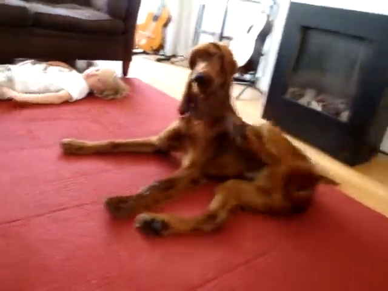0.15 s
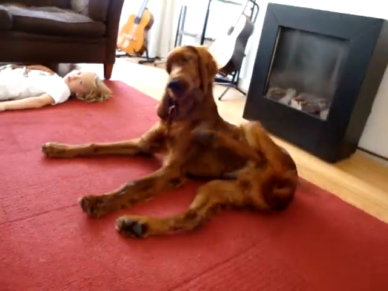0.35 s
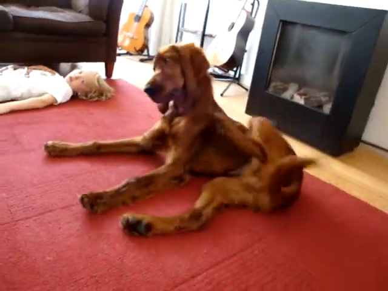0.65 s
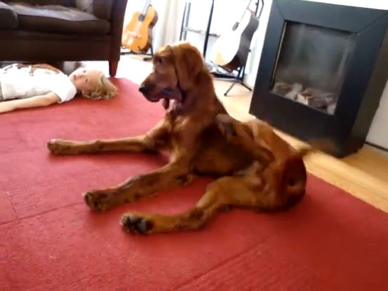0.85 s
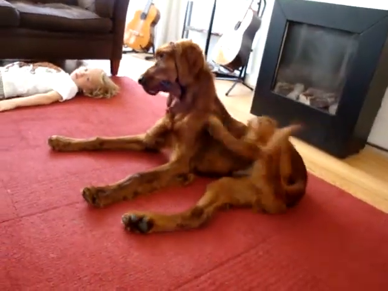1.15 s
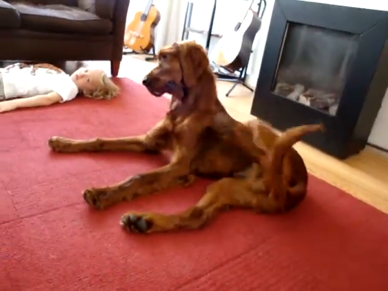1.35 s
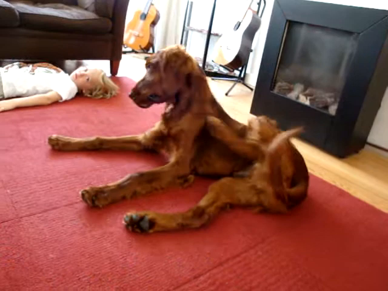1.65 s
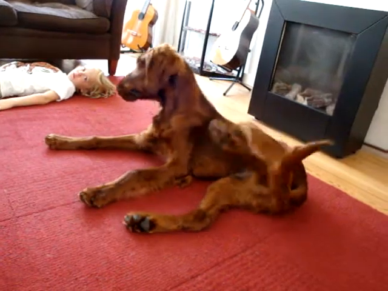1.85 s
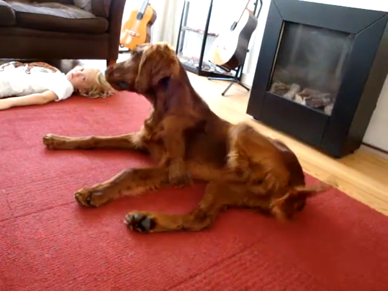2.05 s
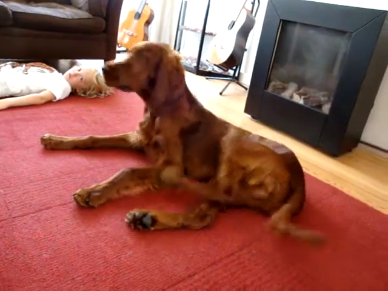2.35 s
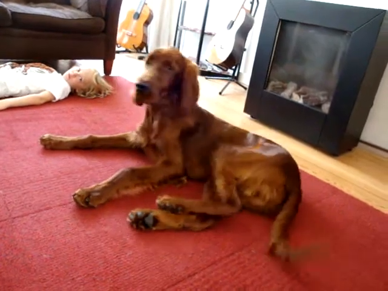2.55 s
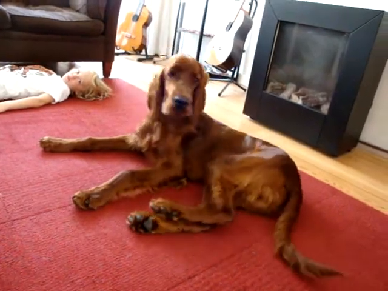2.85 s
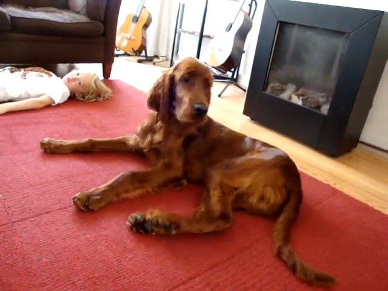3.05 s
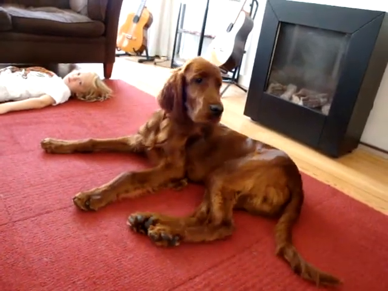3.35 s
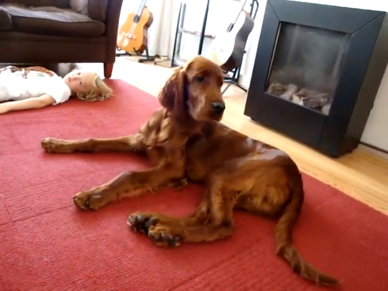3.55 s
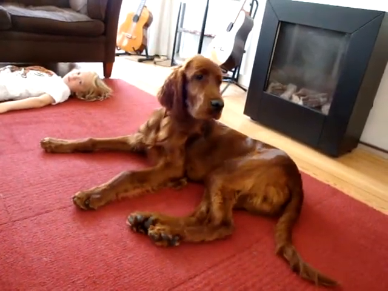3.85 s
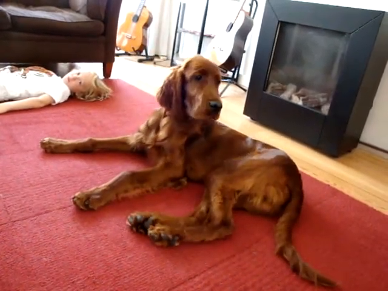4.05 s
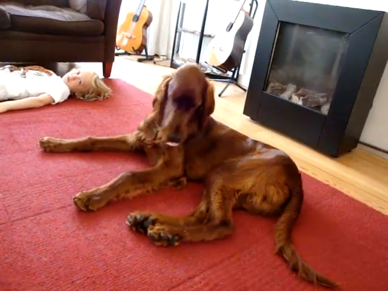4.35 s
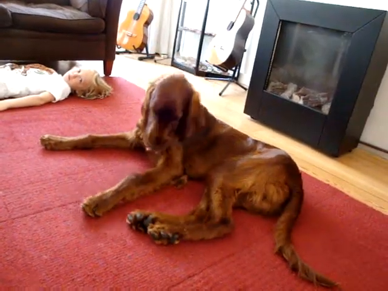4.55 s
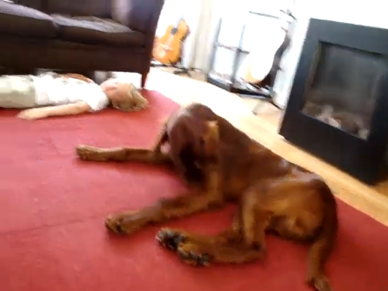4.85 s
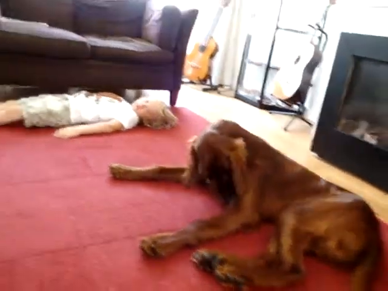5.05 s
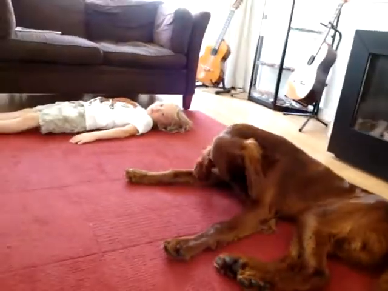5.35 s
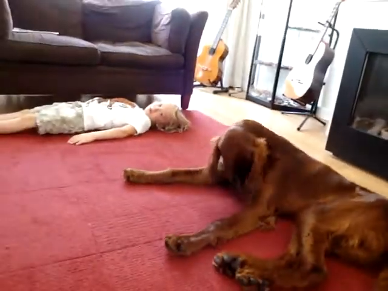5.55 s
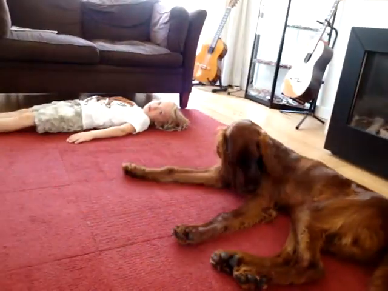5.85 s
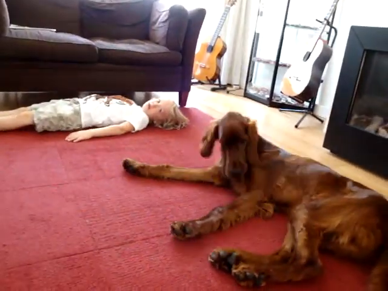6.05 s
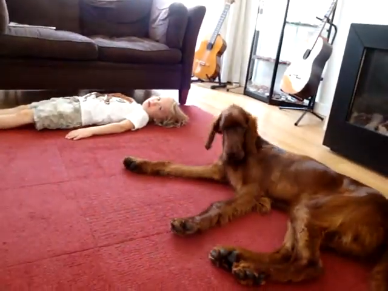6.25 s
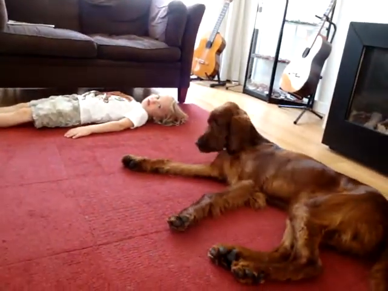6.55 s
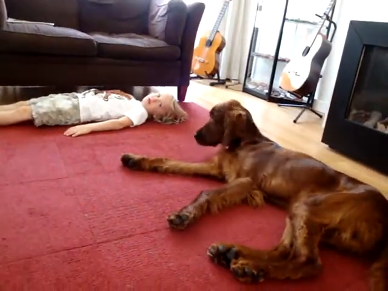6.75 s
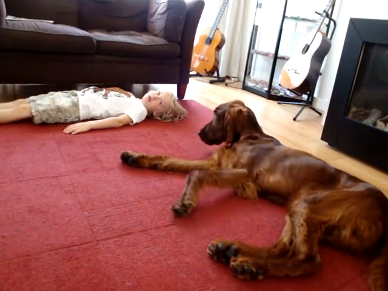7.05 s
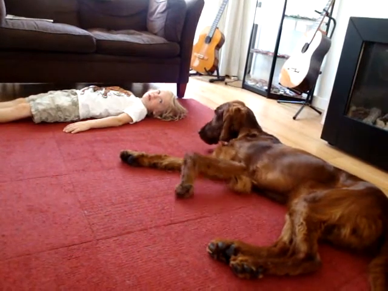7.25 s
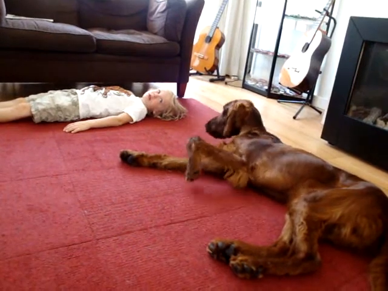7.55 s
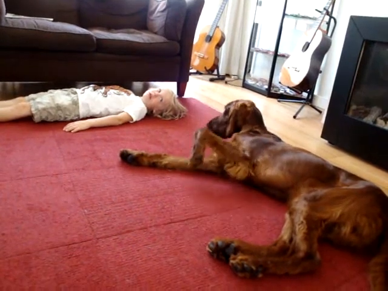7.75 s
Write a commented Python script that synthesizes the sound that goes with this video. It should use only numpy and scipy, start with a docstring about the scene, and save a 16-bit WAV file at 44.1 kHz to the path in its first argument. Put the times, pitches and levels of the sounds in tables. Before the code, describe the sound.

A dog shuffles on a rug with faint nose whistles, then after a sharp click gives four high, swooping whines in a quiet room.

```python
"""A young dog lies on a living-room rug, over quiet room tone. From the start, thin airy whistles come and
go in its nose as it shuffles: fur drags, claws tap, paws and tail bump the floor. From about a second in,
the nostril jets now and then lock into clean squeaks. Near 5 s a small hard part clicks close by and the
treble dips briefly. Then air rushes through the muzzle and the dog breaks into four voiced whines that
each swoop up, fade and ring in the room."""
import sys
import numpy as np
from scipy import signal
from scipy.fft import rfft, irfft, next_fast_len
from scipy.io import wavfile
from scipy.ndimage import uniform_filter1d

SR = 44100
rng = np.random.default_rng(int(sys.argv[2]) if len(sys.argv) > 2 else 0)


def digitize_waveform(pressure):
    """Quantize a signal to 16-bit integers and store it at the path in sys.argv[1].

    Rows of a 2-D input are taken as channels; values are limited to [-1, 1].
    """
    field = np.atleast_2d(pressure).T
    bounded = np.clip(field, -1, 1)
    quanta = np.round(bounded * 32767).astype(np.int16)
    wavfile.write(sys.argv[1], SR, quanta)


N = 348900
T = np.arange(N) / SR


def undb(db):
    """Decibels to gain."""
    return 10 ** (np.asarray(db) / 20)


def unit(x):
    """Scale to rms 1."""
    return x / np.sqrt(np.mean(x ** 2))


def colour(x, points):
    """EQ by a curve of (f/Hz, level/dB) points that rolls off beyond its ends."""
    hz, db = np.transpose(points)
    f = np.maximum(np.arange(len(x) // 2 + 1) * SR / len(x), 1)
    skirts = np.minimum(1, f / hz[0]) ** 2 * np.minimum(1, hz[-1] / f) ** 2
    return irfft(rfft(x) * skirts * undb(np.interp(np.log(f), np.log(hz), db)), len(x))


def noise(points):
    """Coloured noise of rms 1."""
    return unit(colour(rng.standard_normal(N), points))


def wander(rate_hz, size=N):
    """Smooth random modulator of rms 1 that rolls off above the given rate."""
    n = next_fast_len(size, True)
    f = np.arange(n // 2 + 1) * SR / n
    lowpass = np.exp(-.5 * (f / rate_hz) ** 2)
    return unit(irfft(rfft(rng.standard_normal(n)) * lowpass, n)[:size])


def flutter(width_hz):
    """Random amplitude and phase that smear a tone over a narrow band."""
    return wander(width_hz) + 1j * wander(width_hz)


def turn(hz):
    """Phase of an oscillator that follows a pitch curve."""
    return 2 * np.pi * np.cumsum(hz) / SR


def swell(start, length, shape):
    """One arch: its samples, progress (0 to 1) and strength; a lower shape flattens the top."""
    on = slice(*np.searchsorted(T, [start, start + length]))
    progress = np.clip((T[on] - start) / length, 0, 1)
    return on, progress, np.sin(np.pi * progress) ** shape


def strikes(hits, t60, rise=.0005):
    """Envelope of (t/s, level/dB) hits: fast attack, exponential decay."""
    return sum(undb(db - 60 * np.maximum(T - start, 0) / t60) * np.clip((T - start) / rise, 0, 1)
               for start, db in hits)


# Spectra of the low room bed and the hiss above it: f/Hz, level/dB
BED_EQ = [(18, -51.5), (30, -18.5), (392, -2), (548, -2.5), (691, -3), (818, -3.5), (890, -3.5), (1270, -5),
          (2500, -9), (4320, -10.5), (4600, -9), (5980, -40.5), (10100, -120)]
HISS_EQ = [(3500, -23.5), (4600, -4.5), (7000, -1.5), (9900, -6)]
def room_tone(bed_db=-58.5, drift_db=.3, hiss_db=-62.5):
    """A quiet, slowly drifting bed under a steady hiss."""
    return noise(BED_EQ) * undb(bed_db + drift_db * wander(.9)) + noise(HISS_EQ) * undb(hiss_db)


# Airy nose whistles: t/s, length/s, first f/Hz, last f/Hz, level/dB
WHISTLES = [(-0.29, 0.62, 6100, 6510, -59), (0.209, 0.55, 5890, 5980, -61.5),
            (0.56, 0.75, 6025, 5790, -54.5), (1.1, 0.56, 5610, 5830, -60), (1.626, 0.2, 5890, 6170, -53),
            (1.679, 0.32, 5910, 5870, -57.5), (1.839, 0.54, 5460, 5420, -57.0),
            (2.1, 0.26, 6160, 6270, -61.5), (2.272, 0.38, 5140, 6290, -59.5), (2.63, 0.61, 5760, 5830, -56),
            (2.77, 0.64, 6060, 6490, -54.5), (3.335, 0.29, 5500, 6150, -49.5),
            (3.54, 0.29, 6330, 6060, -56), (3.732, 0.6, 5610, 6490, -49), (3.78, 0.67, 4720, 4820, -59),
            (4.13, 0.47, 5970, 5770, -53), (4.468, 0.57, 6030, 5780, -55.5), (4.831, 0.62, 5020, 7100, -53),
            (5.25, 0.81, 5280, 5700, -52.5), (5.94, 0.29, 5640, 5830, -59.5),
            (6.153, 0.51, 5500, 5850, -59.0), (6.701, 0.92, 5240, 5680, -67),
            (7.562, 0.42, 5140, 5910, -64.5)]
# Resonance of the nose: f/Hz, level/dB
NOSE_EQ = [(4300, -5.5), (4900, 2), (6350, 2.5), (6750, -4), (7500, -19)]
def whistles(core_db=-6.5, halo_db=-3.8, side_db=-9, side_ratio=.885, waver=.016):
    """Turbulent nostril jets: a wavering tone in a halo of hiss, the other nostril lower and softer."""
    main = undb(core_db) * flutter(width_hz=107) + undb(halo_db) * flutter(width_hz=470)
    side = undb(side_db) * flutter(width_hz=450)
    wavering = 1 + waver * wander(24.96)
    jets = np.zeros(N)
    for start, length, first_hz, last_hz, db in WHISTLES:
        on, progress, strength = swell(start, length, shape=.68)
        phase = turn((first_hz + (last_hz - first_hz) * progress) * wavering[on])
        nostrils = main[on] * np.exp(1j * phase) + side[on] * np.exp(1j * side_ratio * phase)
        jets[on] += undb(db) * strength * nostrils.imag
    return colour(jets, NOSE_EQ)


# Fur strokes on the rug, plus a faint, dull swell of room tone from 2.5 to 3.2 s:
# t/s, length/s, level/dB, brightness/dB
RUBS_AND_SWELL = [(-.12, 0.28, -51, 1.5), (0.087, 1.17, -62.5, 7.5), (1.424, .32, -55, -2),
                  (1.64, .37, -54, -7), (1.9, 0.42, -64, -2), (2.38, 0.11, -60, 3), (2.5, .7, -70, -14),
                  (4.431, 0.28, -56, 11)]
# Their dull and bright layers: f/Hz, level/dB
DULL_EQ = [(130, -18.5), (300, -11), (500, -4), (720, -0.5), (1050, -1), (1400, -6.5), (2800, -10.5)]
BRIGHT_EQ = [(900, -20), (1500, -3), (2700, 2), (4000, -2.5), (5000, -10), (9000, -21)]
def rubs_and_room_swell(scratch_db=2, bright_trim_db=-1):
    """Fur drags unevenly over the rug and the room tone swells once; brightness tilts the two layers."""
    dull, bright, out = noise(DULL_EQ), noise(BRIGHT_EQ), np.zeros(N)
    for start, length, db, tilt_db in RUBS_AND_SWELL:
        on, _, strength = swell(start, length, shape=.55)
        blend = dull[on] * undb(-tilt_db / 2) + bright[on] * undb(bright_trim_db + tilt_db / 2)
        out[on] += undb(db) * strength * blend
    return out * undb(scratch_db * wander(45)) / np.sqrt(2)


# Light taps: t/s, level/dB
TAPS = [(.02, -50), (.25, -46), (.523, -53), (.603, -46.5), (.712, -51), (.912, -50), (.942, -46.5),
        (1.416, -43.5), (1.436, -50), (5.553, -52), (5.615, -45.5), (5.68, -40), (7.032, -44.5),
        (7.075, -47), (7.092, -46)]
# Their spectrum: f/Hz, level/dB
TAP_EQ = [(200, -12), (700, -8.5), (1300, 0.5), (2500, 2.5), (4000, -15.5), (9000, -18)]
def taps():
    """Claws and mouth make short, bright ticks."""
    return noise(TAP_EQ) * strikes(TAPS, t60=.073)


# Floor bumps: t/s, level/dB
BUMPS = [(.103, -41.5), (.128, -50.5), (.21, -53.5), (.488, -44), (.503, -53.5), (.585, -53), (1.82, -57)]
# Their spectrum: f/Hz, level/dB
BUMP_EQ = [(70, -25), (110, -7.5), (190, -0.5), (400, -0.5), (700, -10.5), (1500, -20), (4000, -24),
           (9000, -40)]
def bumps():
    """Paws and tail land on the floor with dull thuds."""
    return noise(BUMP_EQ) * strikes(BUMPS, t60=.13)


# A single knock: t/s, level/dB
KNOCKS = [(1.172, -48)]
# Its spectrum: f/Hz, level/dB
KNOCK_EQ = [(250, -19), (380, 2.5), (480, -5), (650, -21), (2500, -9)]
def knock():
    """A hit with one narrow low-mid peak that makes it sound hollow."""
    return noise(KNOCK_EQ) * strikes(KNOCKS, t60=.13)


# Clean nose squeaks: t/s, length/s, first f/Hz, last f/Hz, level/dB
SQUEAKS = [(1.2, 0.078, 5200, 5230, -56), (1.664, 0.16, 5940, 6020, -61), (2.9, .23, 6030, 6300, -51),
           (3.223, 0.34, 5234, 5280, -53.5), (3.411, 0.17, 5810, 6300, -49), (3.823, 0.29, 5700, 6340, -47),
           (5.13, 0.15, 6800, 6720, -61)]
def squeaks(waver=.007):
    """A nostril jet locks into a clean tone. Gives the sound and the depth of the lock, 0 to 1."""
    out, locked = np.zeros((2, N))
    wavering = 1 + waver * wander(100)
    for start, length, first_hz, last_hz, db in SQUEAKS:
        on, progress, strength = swell(start, length, shape=.6)
        phase = turn((first_hz + (last_hz - first_hz) * progress) * wavering[on])
        out[on] += undb(db) * strength * np.sin(phase)
        locked[on] = np.maximum(locked[on], strength)
    return out, locked


# Contacts that fuse into one click: t/s, level/dB
CONTACTS = [(4.9703, -24.5), (4.9689, -29), (4.9727, -47)]
# Modes of the struck part: f/Hz, level/dB, t60/s
CLICK_MODES = [(189, -18.5, 0.014), (1435, -11.5, 0.034), (1600, -10.5, 0.022), (2700, -6, 0.0079),
               (4500, -10.5, 0.009)]
def click(crack_db=-5.5):
    """Three contacts within four milliseconds crack and briefly ring a small hard part."""
    crack = noise([(200, 1), (3000, -.5), (6000, -3), (10000, -7)])
    out = undb(crack_db) * crack * strikes(CONTACTS, t60=.0096, rise=.00039)
    t = T[:SR // 10]
    ring = sum(undb(db - 60 * t / t60) * np.sin(2 * np.pi * hz * t) for hz, db, t60 in CLICK_MODES)
    for start, db in CONTACTS:
        first = int(start * SR)
        out[first:first + len(t)] += undb(db) * ring
    return out


def treble_dip(x, start=4.976, end=5.002, depth_db=-43, above_hz=2370):
    """The top end ducks for a moment just after the click."""
    dip = uniform_filter1d(((T > start) & (T < end)) * 1., SR // 300)
    treble = signal.sosfiltfilt(signal.butter(4, above_hz, "high", fs=SR, output="sos"), x)
    return x - treble * (1 - undb(depth_db * dip))


# Rushes of air around the whines: t/s, length/s, level/dB
BREATHS = [(5.42, .43, -55.5), (5.64, .48, -50.5), (6.34, .42, -59.5), (6.902, .55, -54.5),
           (7.64, 0.76, -61)]
def breath(flicker_db=4):
    """Air rushes through the resonances of the muzzle."""
    muzzle_eq = [(400, -13), (800, -7.5), (1200, -1.5), (1900, -6),
                 (2700, -4.5), (3600, -9.5), (4800, -19), (9000, -27.5)]
    flow = np.zeros(N)
    for start, length, db in BREATHS:
        on, _, strength = swell(start, length, shape=1.2)
        flow[on] += undb(db) * strength
    return noise(muzzle_eq) * flow * undb(flicker_db * wander(45))


# Voiced whines: t/s, length/s, low f/Hz, high f/Hz, swoop centre after onset/s, swoop time constant/s,
# level/dB, hold/s, fade/(dB/s), 2nd and 3rd harmonic level/dB re the fundamental
WHINES = [(5.681, 0.55, 616, 1566, 0.094, 0.051, -34.5, .36, 75, -6.5, -15),
          (6.23, .66, 1208, 1687, .217, .097, -37.5, .38, 95, -10.5, -27.5),
          (6.927, .64, 945, 1446, .081, .071, -43.5, .21, 70, -4.5, -37),
          (7.59, .4, 1127, 1638, 0.11, .027, -49, 0.051, 45, -6.5, -25)]
def whine(row, jitter=.0048, flutter_db=2.3, rasp=.085, glide_rasp=.064):
    """A near-pure falsetto swoops up, holds and fades, rasping on fast glides: samples, sound, phase."""
    start, length, low_hz, high_hz, swoop_at, swoop_s, db, hold, fade_rate, second_db, third_db = row
    mouth_hz, mouth_width_hz, mouth_db = 3110, 220, 7  # lifts an overtone gliding through it
    accent_db, pressed_db, accent_s = 5.5, 9, .085  # the opening push is louder and richer
    dulling, ramp_s = .3, .04  # extra overtone loss per dB of fade; attack and release
    on = slice(*np.searchsorted(T, [start, start + length]))
    t = T[on] - start
    faded_db = fade_rate * np.maximum(t - hold, 0)
    push = np.exp(-(t / accent_s) ** 2)

    hz = low_hz + (high_hz - low_hz) * (1 + np.tanh((t - swoop_at) / (2 * swoop_s))) / 2
    hz *= 1 + .135 * np.exp(-t / .043) - .0822 * np.exp((t - length) / .095)  # starts sharp, ends flat
    gliding = np.clip(np.abs(np.gradient(hz)) * SR / 3500, 0, 1)  # full at 3500 Hz per second
    phase = turn(hz * (1 + jitter * (1 + gliding) * wander(55, size=SR)[:len(t)]))

    tone = np.sin(phase)
    upper_db = third_db + pressed_db * push
    for k, partial_db in enumerate([second_db, upper_db, upper_db - 3.5], 2):
        lift_db = mouth_db / (1 + (2 * (k * hz - mouth_hz) / mouth_width_hz) ** 2)
        tone += undb(partial_db + lift_db - dulling * faded_db) * np.sin(k * phase)

    grain = 1 + (rasp + glide_rasp * gliding) * wander(190, size=SR)[:len(t)]
    effort_db = db + accent_db * push - faded_db + flutter_db * wander(25, size=SR)[:len(t)]
    gate = np.clip(np.minimum(t, length - t) / ramp_s, 0, 1)
    return on, np.sqrt(2) * tone * grain * undb(effort_db) * gate, phase


# Weak second tones under the whines: t/s, length/s, first f/Hz, last f/Hz, level/dB
UNDERTONES = [(6.115, .17, 1128, 1059, -56), (6.621, .34, 983, 827, -61), (7.003, 0.6, 1072, 950, -51.5),
              (7.515, 0.089, 1029, 1030, -56), (7.73, 0.29, 1007, 1005, -56.5)]
def undertones(whine_phase, jitter=.022, sum_tone_db=-10):
    """A second, shakier throat oscillation modulates the whine, adding a tone at their summed pitch."""
    out = np.zeros(N)
    wavering = 1 + jitter * wander(100)
    for start, length, first_hz, last_hz, db in UNDERTONES:
        on, progress, strength = swell(start, length, shape=.58)
        phase = turn((first_hz + (last_hz - first_hz) * progress) * wavering[on])
        sum_tone = undb(sum_tone_db) * np.sin(phase + whine_phase[on])
        out[on] += undb(db) * strength * (np.sin(phase) + sum_tone)
    return out


# Resonance of the throat: f/Hz, level/dB
THROAT_EQ = [(500, -1.5), (3500, 0.5), (4600, -12), (5200, -4), (7000, -21.5)]
def voice():
    """The whines and their undertones, coloured by the throat."""
    out, phase = np.zeros((2, N))
    for row in WHINES:
        on, sound, whine_phase = whine(row)
        out[on] += sound
        phase[on] = whine_phase
    return colour(out + undertones(phase), THROAT_EQ)


# Reverb time of the living room: f/Hz, t60/s
ROOM_DECAY = [(150, 0.72), (700, 0.48), (1500, 0.56), (3000, 0.37), (7000, 0.29)]
def room(x, wet_db):
    """Direct sound plus dense reflections that die band by band, mixed at constant power."""
    t = T[:SR]
    f = np.maximum(np.arange(SR // 2 + 1), 1)
    hz, t60s = np.transpose(ROOM_DECAY)
    scatter = rfft(rng.standard_normal(SR))
    tail = np.zeros(SR)
    for weights, t60 in zip(np.eye(len(hz)), t60s):
        band = irfft(scatter * np.interp(np.log(f), np.log(hz), weights), SR)
        tail += band * undb(-60 * t / t60)
    tail *= np.clip(t / .0075, 0, 1)
    response = undb(wet_db) * tail / np.sqrt(np.sum(tail ** 2))
    response[0] += 1  # direct path
    return signal.fftconvolve(x, response)[:N] / np.sqrt(1 + undb(2 * wet_db))


def scene(duck_db=-5):
    """Mono mix: three reverb sends over room tone, the close click dry on top."""
    whining = room(voice(), wet_db=-4.5)
    airy = whistles()
    clean, locked = squeaks()
    nose = room(airy * undb(duck_db * locked) + clean, wet_db=-10)  # the hiss thins as a jet locks
    foley = room(breath() + rubs_and_room_swell() + bumps() + knock() + taps(), wet_db=-7)
    return (treble_dip(whining + nose + foley + room_tone()) + click())[None]


def record(dry, top_hz=10050):
    """A steep high cut on the whole mix."""
    return signal.sosfilt(signal.ellip(12, .2, 70, top_hz, fs=SR, output="sos"), dry)


dry = scene()
out = record(dry)
digitize_waveform(out)
```